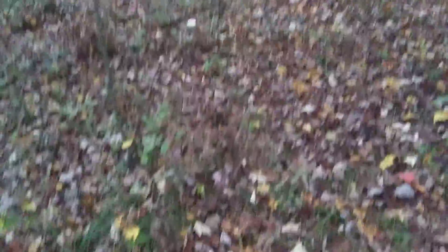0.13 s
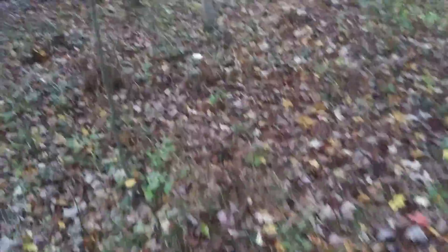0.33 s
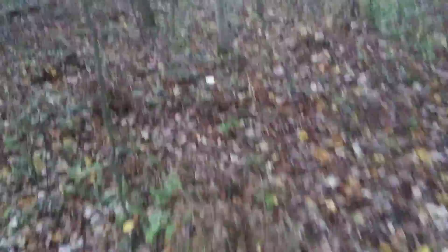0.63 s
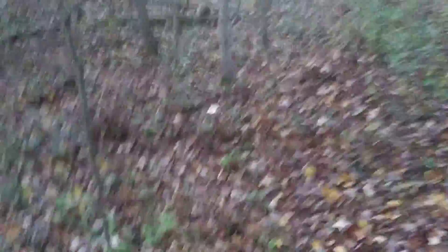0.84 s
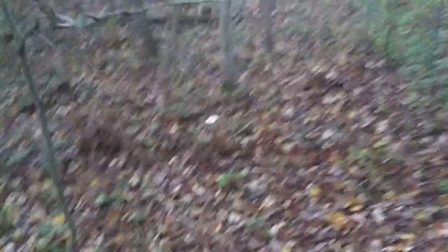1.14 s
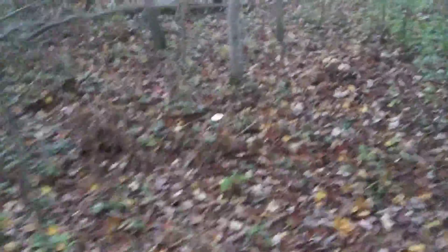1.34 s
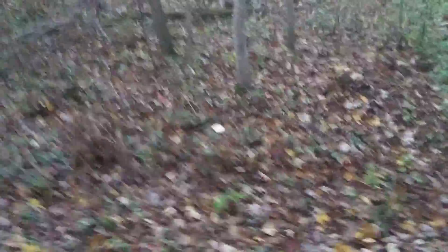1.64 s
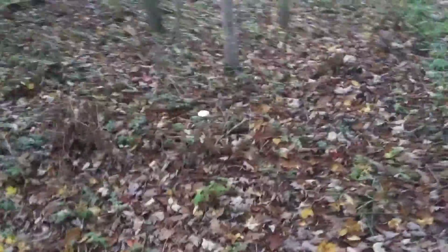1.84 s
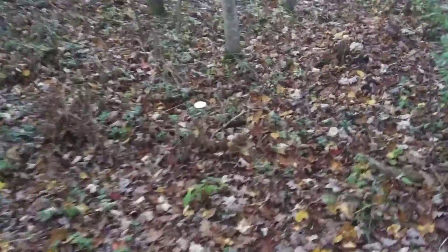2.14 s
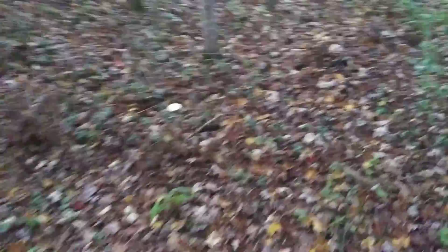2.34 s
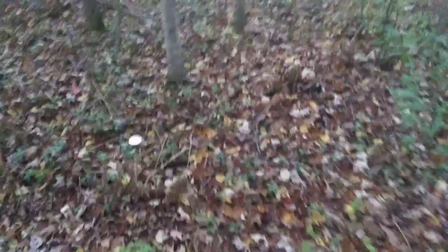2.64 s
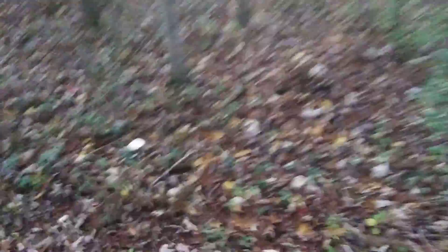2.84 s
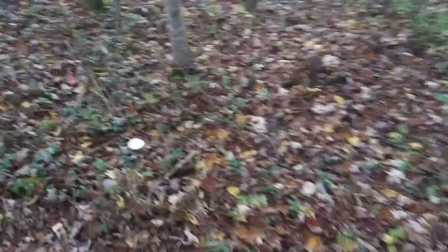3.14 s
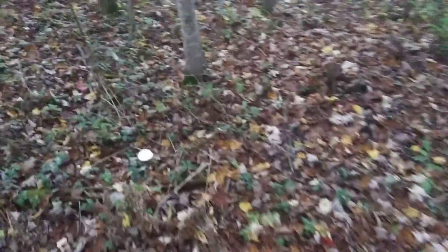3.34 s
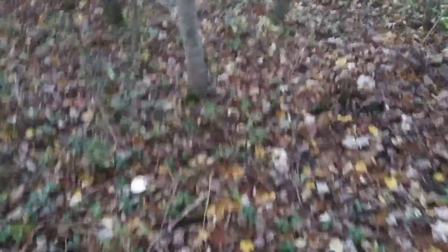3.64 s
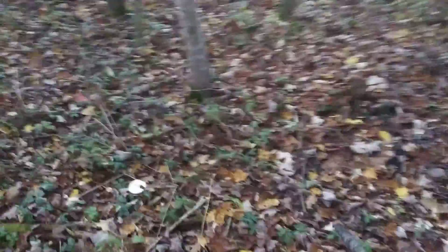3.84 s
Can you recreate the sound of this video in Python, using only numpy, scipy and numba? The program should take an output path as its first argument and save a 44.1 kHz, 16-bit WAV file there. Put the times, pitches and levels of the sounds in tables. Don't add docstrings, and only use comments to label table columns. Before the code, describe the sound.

Slow footsteps in dry leaves, heard from chest height on a phone. Silence fades in over the first 0.35 s onto a trailing drag. A soft rustling step comes at 0.8-1.0 s, a firmer crackling crush at 1.45-1.75, settling by 2.0. Light brushing and snaps follow from 2.15, then the loudest crunches around 2.75 and 3.55, with ticks and a fading drag to 4 s. Faint air underneath, thin lows.

```python
import sys
import numpy as np
from scipy import signal
from scipy.fft import rfft, irfft
from scipy.io import wavfile
from scipy.ndimage import uniform_filter1d
from numba import njit

SR = 44100
rng = np.random.default_rng(int(sys.argv[2]) if len(sys.argv) > 2 else 0)


def attenuation_scalar(level_db):
    decades = np.asarray(level_db, float) / 20
    return 10 ** decades


def dump(signal):
    limited = np.clip(np.atleast_2d(signal).T, -1, 1)
    pcm = np.round(limited * 32767).astype(np.int16)
    wavfile.write(sys.argv[1], SR, pcm)


N = 176400

# frequency in Hz, level in dB.
AIR_COLOUR = [(20, -30), (100, -25), (220, -3.5), (450, -2.5), (1000, -8), (4500, -18.5), (7500, -32),
              (14000, -19)]
# frequency in Hz, level in dB.
LEAF_COLOUR = [(250, -15), (800, -3.5), (1150, -6.5), (4800, -2.5), (5800, -10), (8000, -12), (10000, -6.5),
               (15700, -14)]
# time in seconds, crush level in
# dB.
FIRST_STEPS = [
    [(.12, -45.5), (.17, -45), (.21, -46), (.275, -51), (.3, -61), (.32, -54.5), (.38, -64), (.45, -64)],
    [(.5, -63.5), (.52, -58.5), (.555, -62.5), (.582, -69), (.744, -72)],
    [(.786, -52.5), (.81, -53), (.87, -59.5), (.925, -50.5), (.965, -52), (.975, -60.5), (1.15, -64),
     (1.36, -76), (1.39, -61)],
    [(1.425, -67), (1.445, -59.5), (1.46, -48.5), (1.495, -44), (1.54, -48.5), (1.585, -41), (1.635, -40),
     (1.67, -45), (1.71, -40)],
    [(1.76, -49.5), (1.78, -52), (1.84, -50.5), (1.86, -56), (1.92, -57.5), (2.02, -66.5), (2.1, -63)],
]
# time in seconds, crush level
# in dB.
LAST_STEPS = [
    [(2.168, -53), (2.2, -58.5), (2.25, -64), (2.29, -64), (2.35, -56.5), (2.4, -61), (2.5, -60.5)],
    [(2.54, -49.5), (2.59, -56), (2.605, -47), (2.64, -45.5), (2.66, -46.5), (2.7, -42), (2.73, -34),
     (2.77, -33), (2.81, -38.5)],
    [(2.855, -43.5), (2.87, -49.5), (2.9, -47), (2.95, -54), (2.965, -53.5), (2.99, -62), (3.2, -70),
     (3.31, -66.5), (3.35, -70.5)],
    [(3.385, -48.5), (3.42, -53.5), (3.44, -45), (3.48, -44), (3.55, -35), (3.585, -37.5), (3.62, -36),
     (3.66, -44.5)],
    [(3.73, -40.5), (3.79, -48), (3.855, -44.5), (3.885, -49), (3.9, -57), (3.95, -62), (4.0, -57)],
]
MOVEMENT_TILT = [0.42, 0.2, -1.2, 0.5, -1.15, -0.67, -0.73, 0.19, -0.55, -0.88]
MOVEMENT_CRACKLE = [-6.5, -6, -4, -6, -4.5, -4.5, -6, -2, -5.5, -4]
# time in seconds, swell in dB.
LEAF_CLUMPS = [(0.17, 7), (0.195, 5.5), (0.24, 4.5), (0.315, 4.0), (0.365, 6.5), (0.756, 8), (0.784, 2),
               (0.869, 5), (0.926, 5), (1.067, 3), (1.465, 3.5), (1.509, 3), (1.519, -1), (1.556, 5.5),
               (1.567, 6), (1.595, 1), (1.659, 4), (1.689, 2.5), (1.707, 3), (1.721, 1.5), (1.749, 3.5),
               (1.752, 4.5), (1.76, 4), (1.778, 4), (1.799, 4.5), (1.943, 4.5), (2.013, 3), (2.068, 5),
               (2.128, 2), (2.18, 7), (2.202, 2), (2.223, 6), (2.261, 8), (2.277, 8), (2.333, 10),
               (2.425, 10),
               (2.449, 5.0), (2.491, 6.2), (2.507, 3.7), (2.54, 3.3), (2.559, 4.2), (2.624, 3.3),
               (2.632, 3.5), (2.694, 1.6), (2.731, 2.7), (2.841, 2.5), (2.848, 3.4), (2.895, 2.7),
               (2.928, 3.5), (3.105, 4.2), (3.166, 7.3), (3.237, 4.9), (3.26, 6.3), (3.289, 4.1),
               (3.308, 6.8), (3.413, 3.2), (3.446, 2.7), (3.465, 1.9), (3.488, 3.5), (3.532, 2.9),
               (3.551, 1.4), (3.56, 1.6), (3.586, 2.5), (3.617, 2), (3.649, 2.0), (3.656, 4.9),
               (3.683, 2.7), (3.69, 2), (3.698, 2.6), (3.743, 3.0), (3.853, 5.5), (3.862, 3.0)]
# start in seconds, peak level in dB, pitch in Hz.
LEAF_TICKS = [(0.4288, -48, 10500), (0.4623, -50, 9400), (0.5481, -54, 9900), (0.9287, -37, 10700),
              (1.0065, -48, 11300), (1.0379, -50, 9000), (1.0983, -56, 10600), (1.1098, -53, 10600),
              (1.1287, -56, 8700), (1.1377, -55, 9600), (1.1791, -60, 12700), (1.8058, -34, 10400),
              (1.885, -46, 10900), (1.9928, -47, 9700), (2.0447, -49, 13100), (2.0771, -48, 11200),
              (2.102, -51, 10200), (2.2312, -52, 9400), (2.3998, -52, 10400), (2.4442, -47, 11600),
              (2.8648, -31, 11100), (2.9333, -35, 9800), (2.947, -40, 9700), (3.009, -54, 9700),
              (3.0908, -58, 11100), (3.3178, -49, 12100), (3.3307, -57, 13400), (3.9204, -50, 11100),
              (3.9573, -46, 10000), (3.9703, -54, 11500)]
# start in seconds, peak level in dB, ring pitch in Hz, treble crack relative to the ring in dB.
EARLY_SNAPS = [(0.466, -47.5, 4500, 8), (0.805, -44, 1340, -5), (0.844, -39, 4900, -6),
               (0.889, -50, 3500, 9), (0.908, -40, 1390, -10), (0.966, -46, 1960, 7),
               (1.089, -63, 1760, 14), (1.279, -60, 980, 7), (1.376, -48, 2210, 1.5),
               (1.488, -27, 4400, -5), (1.584, -31, 2810, 4.5), (1.605, -35, 4750, -8),
               (1.631, -26, 3380, -3), (1.636, -45, 325, -20), (1.831, -37, 3070, -0.5),
               (1.844, -36, 3320, 1), (1.851, -40, 1600, -8), (1.867, -45, 2060, 5.5),
               (1.909, -47, 2430, 10), (1.919, -40, 2800, 3), (1.959, -47, 2470, 5.5),
               (2.119, -43, 4550, -2)]
MIDDLE_SNAPS = [(2.15, -30.5, 4240, -13), (2.159, -40, 4700, 2), (2.173, -28, 4200, -3),
                (2.268, -39, 4290, 1), (2.291, -34, 4400, 4), (2.295, -31.5, 4900, -7),
                (2.308, -37, 2400, -4), (2.326, -36.5, 2570, -4), (2.346, -33.5, 2630, -5.5),
                (2.368, -41, 2680, -11), (2.378, -32.5, 2750, 0), (2.384, -37, 3070, -3.5),
                (2.433, -36, 4850, -5), (2.467, -35.5, 3440, -8), (2.526, -44, 2350, -4),
                (2.725, -19.5, 3620, -5), (2.751, -28, 4470, 0), (2.765, -21, 2230, -13),
                (2.772, -30, 4290, -7), (2.8, -27, 1320, 5), (2.807, -18, 4220, -6),
                (2.834, -22, 3000, -1.5), (2.9, -52, 1930, -6), (2.957, -25, 4070, -3.5),
                (2.963, -36, 3930, -7), (2.971, -34, 4300, 5), (2.981, -39, 1840, 4)]
LATE_SNAPS = [(3.014, -45, 1770, 3), (3.032, -36, 4300, -1), (3.117, -41, 4320, -11),
              (3.227, -50, 4000, -6), (3.253, -41, 4020, -14), (3.268, -41.5, 3870, -0.5),
              (3.312, -45.5, 2550, 6), (3.384, -36.5, 1880, 0), (3.434, -36, 1950, 0),
              (3.512, -18, 2800, -8), (3.609, -24, 1930, -2), (3.616, -42, 420, -20),
              (3.622, -27, 2060, -11), (3.712, -33.5, 2000, 6), (3.759, -29, 2040, 3.5),
              (3.78, -33, 2000, 4), (3.806, -33.5, 2400, 10), (3.821, -34, 1230, -16),
              (3.882, -35.5, 1270, -25), (3.961, -40, 4900, -7), (3.988, -42, 3320, 7)]


def unit(x):
    return x / np.sqrt(np.mean(x ** 2))


def colour(x, points):
    hz, db = np.array(points).T
    bins_hz = np.arange(1025) * SR / 2048
    log_gain = np.interp(np.log(bins_hz + 1), np.log(hz), db) * np.log(10) / 20
    cepstrum = irfft(log_gain)
    cepstrum[1:1024] *= 2
    cepstrum[1025:] = 0
    response = irfft(np.exp(rfft(cepstrum)))
    return signal.fftconvolve(x, response)[:N]


def walk(rate_hz):
    hold = int(SR / rate_hz)
    values = rng.standard_normal(N // hold + 1)
    return unit(uniform_filter1d(np.repeat(values, hold), hold)[:N])


def samples(seconds):
    return (seconds * SR).astype(np.int64)


@njit
def grains(out, start, hz, cycles, size, phase):
    for g in range(len(start)):
        turn = np.exp((2j * np.pi - 1 / cycles[g]) * hz[g] / SR)
        rise_step = np.exp(-3 * hz[g] / SR / cycles[g])
        unrisen = 1.
        z = size[g] * np.exp(1j * phase[g])
        end = min(len(out), start[g] + int(6 * cycles[g] * SR / hz[g]))
        for i in range(start[g], end):
            out[i] += z.imag * (1 - unrisen)
            z *= turn
            unrisen *= rise_step
    return out


def air():
    level_db = -67 + .6 * walk(3.22)
    return unit(colour(rng.standard_normal(N), AIR_COLOUR)) * attenuation_scalar(level_db)


def crackle(crush_db, tilt_db, flutter_db):
    cracks_per_s, spread_db, top_db, crack_cycles = 2500, 3.5, 11, 1.09
    u = rng.random((cracks_per_s * 4, 5)).T
    at = (u[0] * N).astype(np.int64)
    hz = 250 * 64 ** u[1] ** .7
    octave = np.log2(hz / 3000)
    limit_db = top_db * np.minimum(hz / 2500, 1) ** 0.23
    size_db = np.minimum(-spread_db * np.log(1 - u[2]), limit_db) + 4.08 * octave
    cycles = crack_cycles * (.5 + u[3])
    phase = 2 * np.pi * u[4]
    steady = grains(np.zeros(N), at, hz, cycles, attenuation_scalar(size_db), phase)
    moving_db = size_db + (crush_db + flutter_db)[at] + tilt_db[at] * octave
    moving = grains(np.zeros(N), at, hz, cycles, attenuation_scalar(moving_db), phase)
    return colour(moving, LEAF_COLOUR) / np.std(colour(steady, LEAF_COLOUR))


def rustle(crush_db, tilt_db, flutter_db):
    moving, steady = 0, 0
    for hz in 180 * 2. ** np.arange(7):
        octave = signal.butter(2, [hz / 1.414, hz * 1.414], "band", fs=SR, output="sos")
        band = signal.sosfilt(octave, rng.standard_normal(N))
        own_flutter_db = 2 * walk(60)
        level_db = crush_db + flutter_db + own_flutter_db + tilt_db * np.log2(hz / 3000)
        steady = steady + band
        moving = moving + band * attenuation_scalar(level_db)
    return colour(moving, LEAF_COLOUR) / np.std(colour(steady, LEAF_COLOUR))


def clumps():
    width_s, snap_swell_db = .0018, 3
    s, rise_db = np.array(LEAF_CLUMPS).T
    snap_s = np.array(EARLY_SNAPS + MIDDLE_SNAPS + LATE_SNAPS)[:, 0]
    hits = np.zeros(N)
    hits[samples(s)] = rise_db
    hits[samples(snap_s)] = snap_swell_db
    swell = np.exp(-.5 * (np.arange(-512, 513) / (width_s * SR)) ** 2)
    return signal.fftconvolve(hits, swell, "same")


def ticks():
    cycles, gain_db = 1.5, 7
    s, db, hz = np.array(LEAF_TICKS).T
    return grains(np.zeros(N), samples(s), hz, cycles + 0 * s, attenuation_scalar(db + gain_db), 0 * s)


def snaps():
    cycles, gain_db, burst_s = 1.4, 1.5, .0004
    pieces, scatter_s, fall_db = 6, .0015, 15
    s, db, hz, crack_db = np.array(EARLY_SNAPS + MIDDLE_SNAPS + LATE_SNAPS).T
    at = samples(s)
    ring_db = db + gain_db
    treble_db = ring_db + crack_db
    ring = grains(np.zeros(N), at, hz, cycles + 0 * s, attenuation_scalar(ring_db), 0 * s)

    hits = np.zeros(N)
    hits[at] = attenuation_scalar(treble_db)
    k = np.arange(512) / (burst_s * SR)
    swell = np.e * k * np.exp(-k)
    burst = signal.fftconvolve(hits, swell)[:N] * rng.standard_normal(N)
    burst = signal.lfilter(*signal.butter(2, 2500, "high", fs=SR), burst)

    u = rng.random((len(s), 3, pieces))
    late = -np.log(1 - u[:, 0])
    when = (at[:, None] + late * scatter_s * SR).astype(np.int64).ravel()
    size = attenuation_scalar(treble_db[:, None] - fall_db * late).ravel()
    pitch = (1500 * 10 ** u[:, 1]).ravel()
    phase = 2 * np.pi * u[:, 2].ravel()
    splinters = grains(np.zeros(N), when, pitch, cycles + 0 * size, size, phase)
    return ring + colour(burst + splinters, LEAF_COLOUR)


def scatter(feet):
    echo_db, t60_s = -15, .025
    tail = rng.standard_normal(4096) * attenuation_scalar(-60 * np.arange(4096) / SR / t60_s)
    tail = tail / np.sqrt(np.sum(tail ** 2))
    return attenuation_scalar(echo_db) * signal.fftconvolve(feet, tail)[:N]


def case_ring(feet):
    case_hz, case_q, case_db = 2070, 2.9, -6
    return attenuation_scalar(case_db) * signal.lfilter(*signal.iirpeak(case_hz, case_q, fs=SR), feet)


def scene():
    t = np.arange(N) / SR
    steps = FIRST_STEPS + LAST_STEPS
    s, db = np.concatenate(steps).T
    middle_s = [np.mean(np.array(step)[:, 0]) for step in steps]
    crush_db = np.interp(t, s, db) + clumps()
    tilt_db = np.interp(t, middle_s, MOVEMENT_TILT)
    flutter_db = 0.47 * walk(90) + 0.48 * walk(30)

    crackle_gain = attenuation_scalar(np.interp(t, middle_s, MOVEMENT_CRACKLE))
    feet = crackle_gain * crackle(crush_db, tilt_db, flutter_db)
    feet = feet + attenuation_scalar(-4) * rustle(crush_db, tilt_db, flutter_db)
    feet = feet + ticks() + snaps()
    feet = feet + scatter(feet)
    feet = feet + case_ring(feet)
    low_cut = signal.butter(4, 234, "high", fs=SR, output="sos")
    return (signal.sosfilt(low_cut, feet) + air())[None]


def low_pass(x):
    return signal.sosfilt(signal.butter(12, 16410, fs=SR, output="sos"), x)


def record(dry):
    start_s, fade_s, top_hz = 0.113, 0.24, 15750
    fade = np.clip((np.arange(N) / SR - start_s) / fade_s, 0, 1)
    top_cut = signal.ellip(10, .2, 32, top_hz, fs=SR, output="sos")
    return low_pass(signal.sosfilt(top_cut, dry) * fade)


dry = scene()
out = record(dry)
dump(out)
```